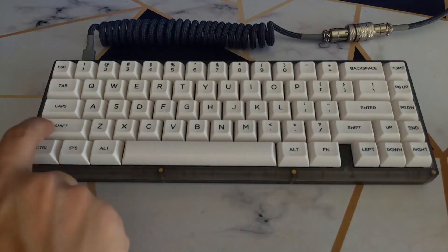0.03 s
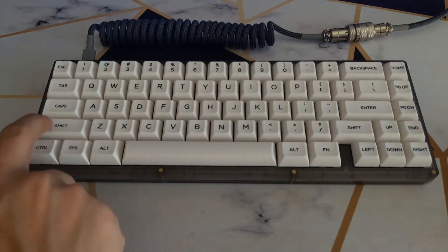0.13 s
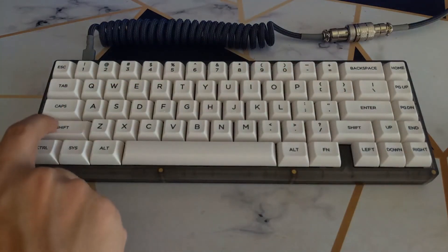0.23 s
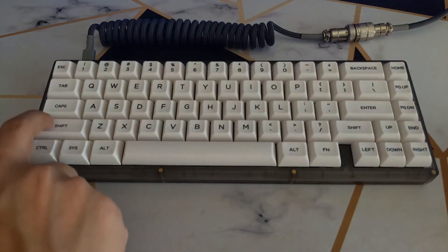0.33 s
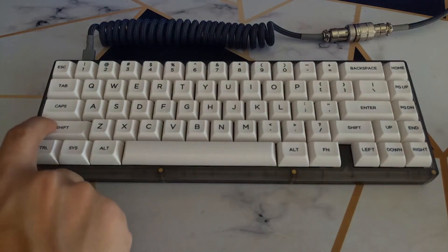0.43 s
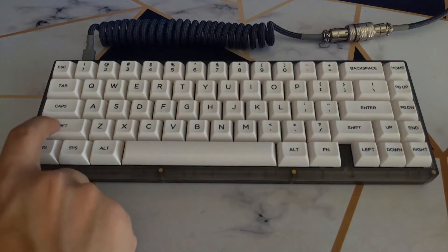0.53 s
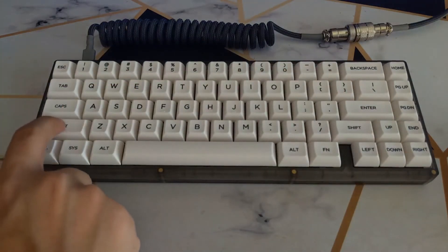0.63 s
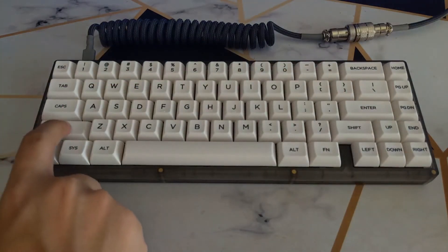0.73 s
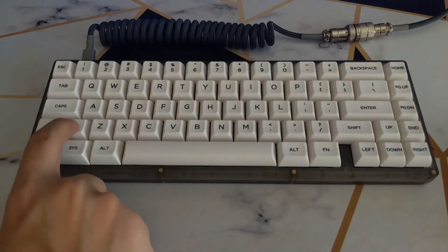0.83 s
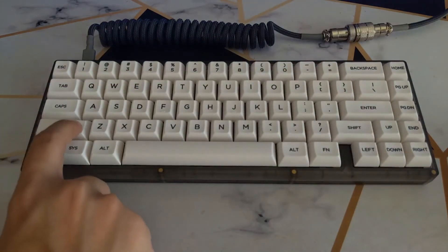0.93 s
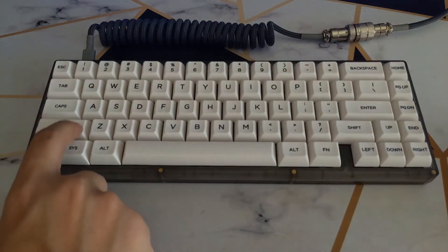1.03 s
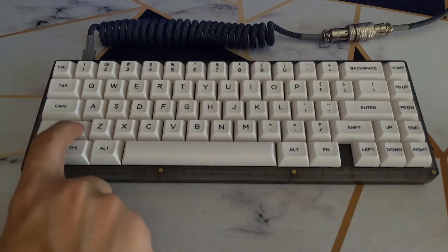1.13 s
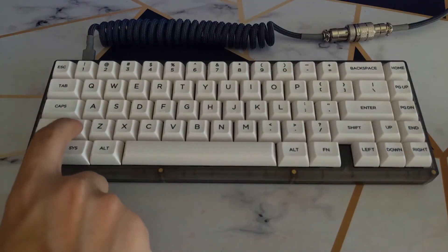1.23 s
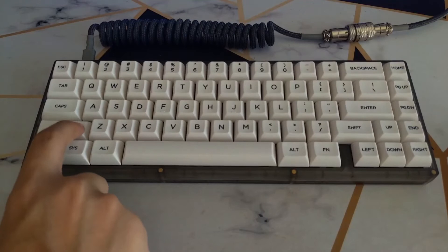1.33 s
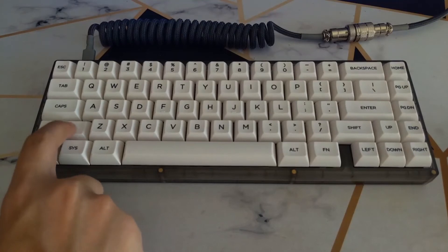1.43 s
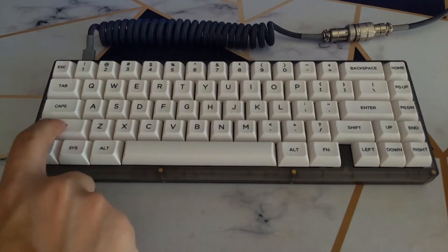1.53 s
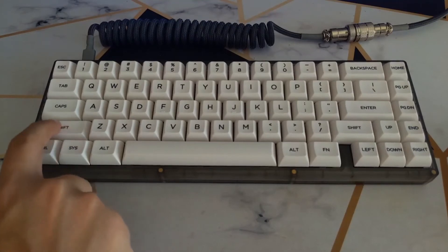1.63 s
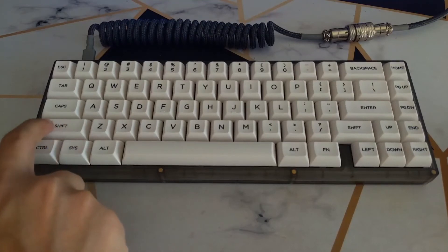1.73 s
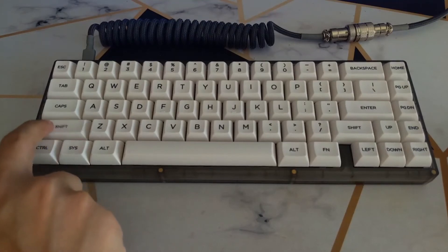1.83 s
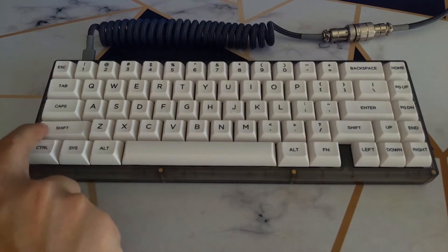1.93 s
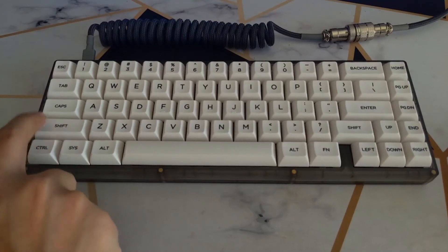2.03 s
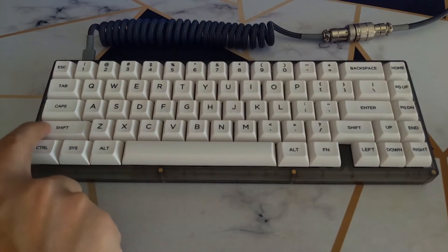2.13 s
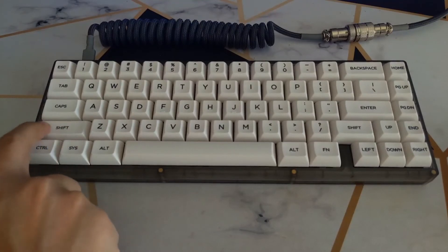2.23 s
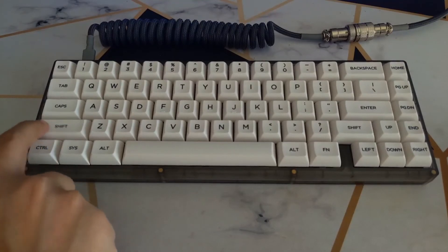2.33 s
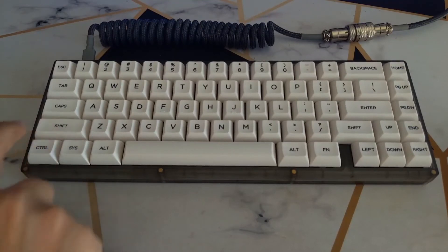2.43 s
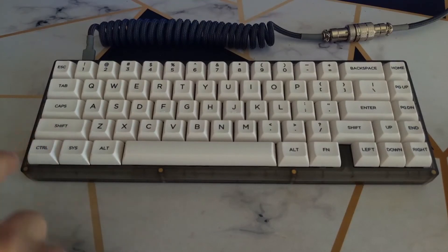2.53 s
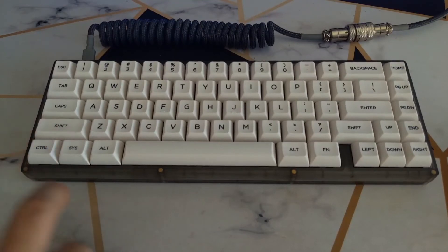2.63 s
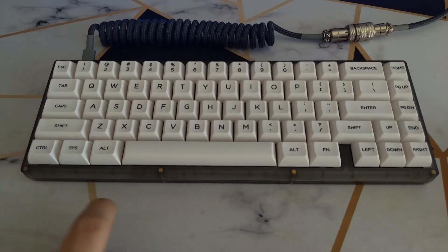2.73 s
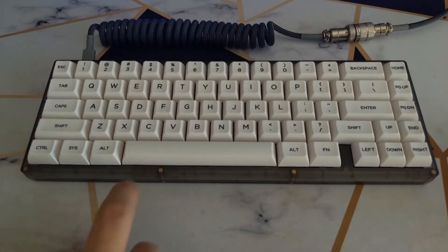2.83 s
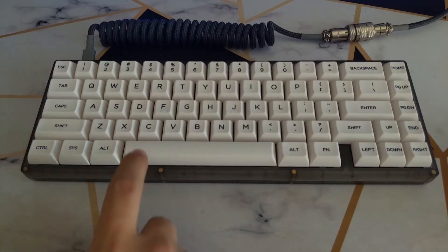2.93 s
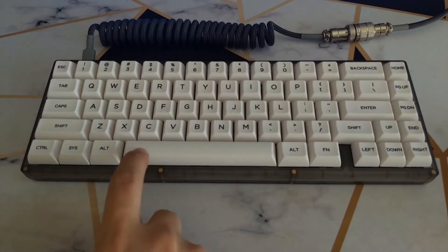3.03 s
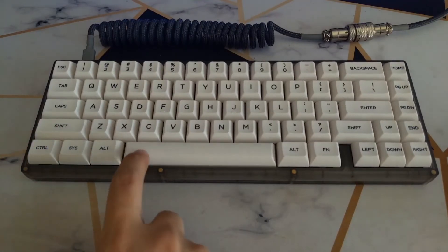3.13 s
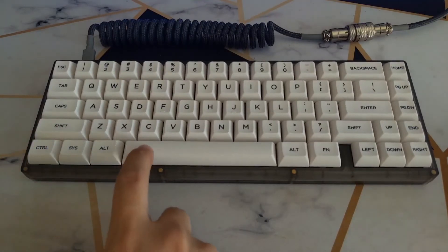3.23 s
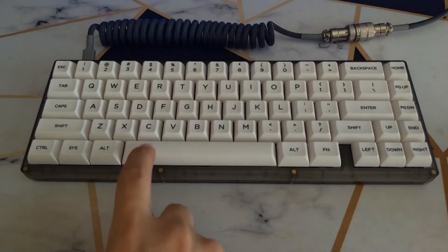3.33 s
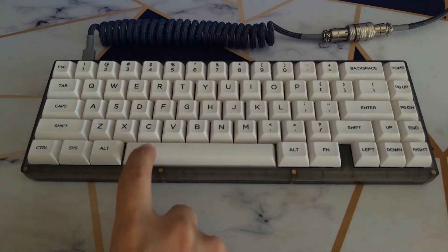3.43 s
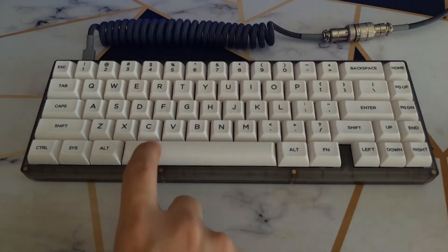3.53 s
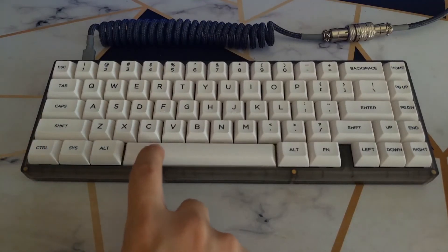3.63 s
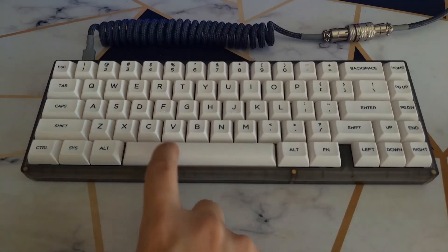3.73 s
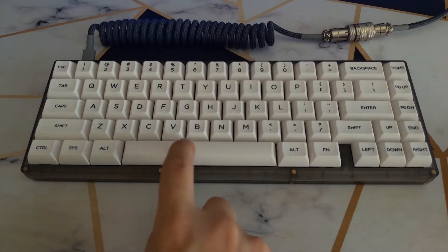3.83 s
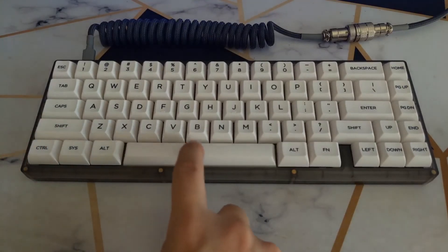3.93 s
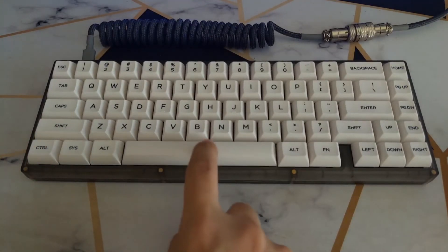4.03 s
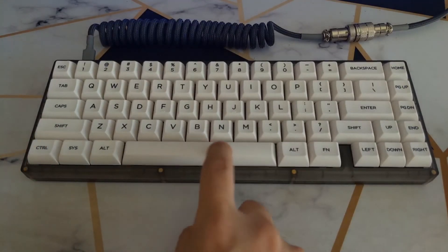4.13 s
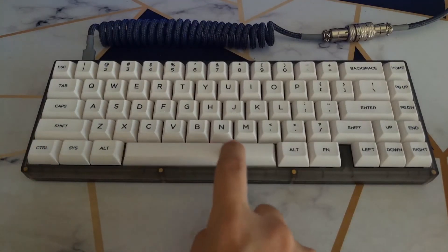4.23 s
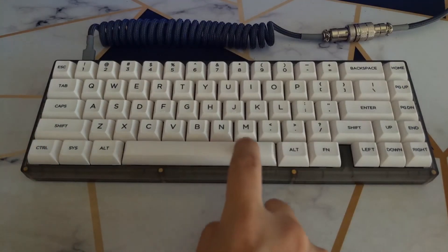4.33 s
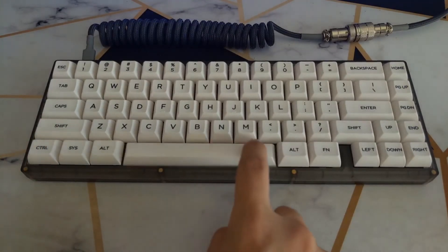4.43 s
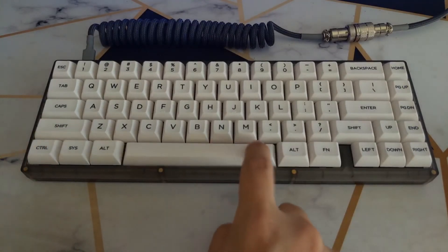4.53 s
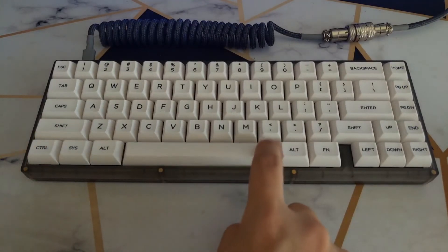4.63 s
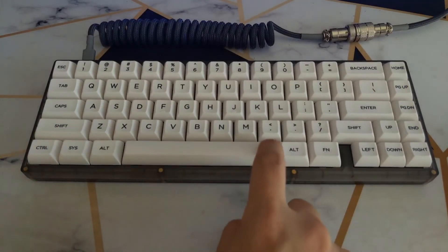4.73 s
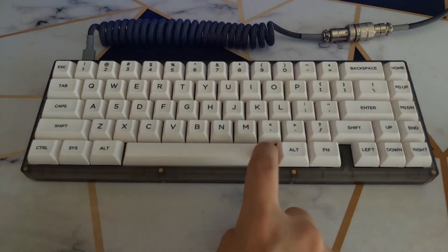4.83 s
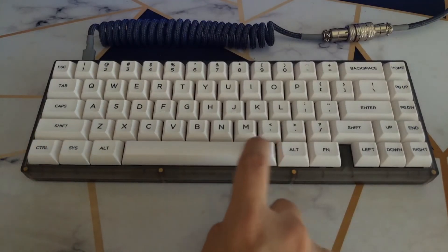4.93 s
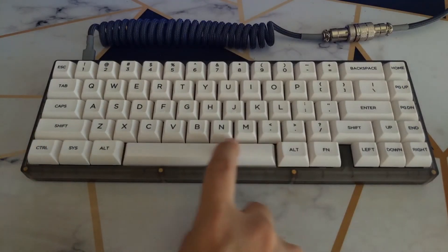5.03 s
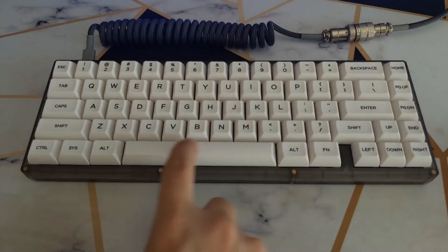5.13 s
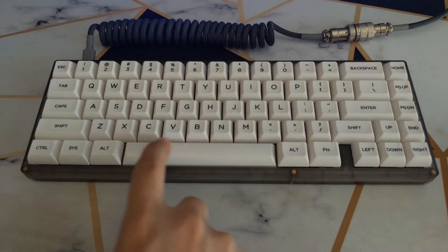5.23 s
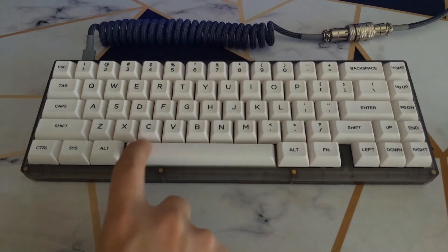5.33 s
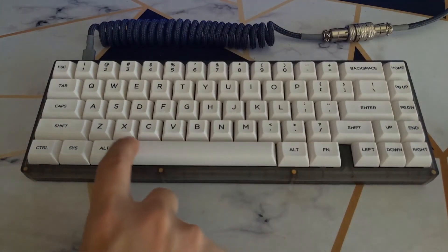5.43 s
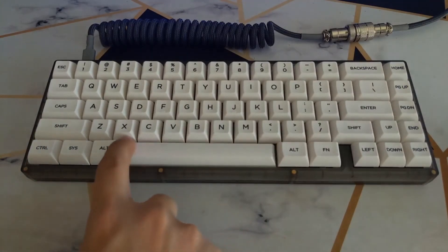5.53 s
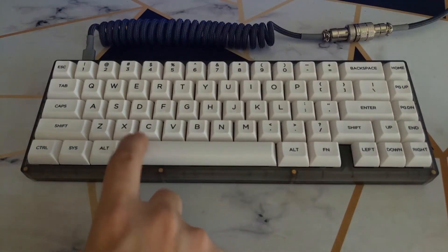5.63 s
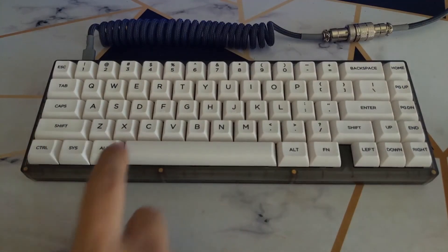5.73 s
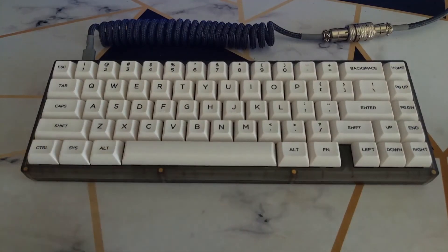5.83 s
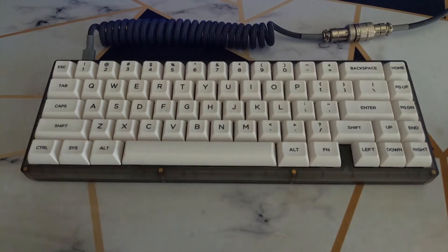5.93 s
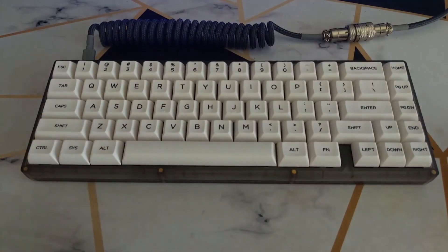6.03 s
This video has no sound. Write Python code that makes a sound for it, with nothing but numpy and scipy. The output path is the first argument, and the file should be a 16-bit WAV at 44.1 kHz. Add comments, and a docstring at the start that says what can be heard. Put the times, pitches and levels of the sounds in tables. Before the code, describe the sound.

A mechanical keyboard is heard close by in a small, quiet room with a short reverberation. From about 0.2 seconds one finger taps the shift key twelve times, evenly, at roughly six presses a second. Each press is a short, tight plastic thock, followed by a rattling clack as the key springs back, with a very faint spring ring. Some strokes are brighter, others softer, and faint fingertip ticks lead into several. The last release comes at 2.3 seconds, followed by a pause. At about 3.1 seconds a soft touch starts the space bar, which is pressed fifteen times at a similar pace. It sounds deeper and hollower, with little rattle, hesitates briefly around 4.4 seconds, then hits slightly harder until the final release near 5.6 seconds. Throughout, the strokes stir soft desk thumps and a low rumble, which fade by about 6 seconds.

```python
"""Mechanical keyboard: one finger taps the left shift key, then the space bar, close by in a small room.
Each key bottoms out with a short thock and springs back against its stop with a rattling clack;
both are contacts that ring the key's damped modes. Faint fingertip ticks and stem rub lead in.
The strokes also thump the desk, which booms and sways under the keyboard, and stir a low rumble."""
import sys
import numpy as np
from scipy import signal
from scipy.fft import rfft, irfft
from scipy.io import wavfile
from scipy.ndimage import uniform_filter1d

SR = 44100
rng = np.random.default_rng(int(sys.argv[2]) if len(sys.argv) > 2 else 0)


def output_pcm(signal):
    """Save a mono or channel-first signal as 16-bit PCM at the path in sys.argv[1].

    Samples are clipped to [-1, 1] before scaling.
    """
    pcm = np.clip(np.atleast_2d(signal).T, -1, 1) * 32767
    wavfile.write(sys.argv[1], SR, np.round(pcm).astype(np.int16))


N = 267687
CLICK_SAMPLES, LEAD_S = 4096, 0.003
BINS_HZ = np.fft.rfftfreq(CLICK_SAMPLES, 1 / SR)
USUAL_DB = -46.5  # reference stroke level

# Strokes: t/s, relative level/dB, snap/dB (how hard and bright the contact is); the first bar row is the finger
# landing softly on the bar
SHIFT_PRESSES = [(0.2055, -42.5, 3.5), (0.3819, -41, 12), (0.5465, -44.5, -6.5), (0.7059, -46, -3),
                 (0.9352, -42.5, -12), (1.0945, -41, 8.5), (1.2619, -39, 5), (1.419, -40, 10.5),
                 (1.5905, -44.5, 2), (1.7452, -39.5, 8), (1.9121, -40, -10), (2.0827, -38.5, -3)]
SHIFT_RELEASES = [(0.2843, -44.5, -0.5), (0.457, -45, -5.5), (0.6109, -41, 3), (0.7754, -48.5, 4.5),
                  (1.0238, -48.5, -18.5), (1.1952, -50.5, -33), (1.3451, -44.5, 25.5), (1.5045, -44, -8.5),
                  (1.6729, -44, -4), (1.8291, -42.5, -8.5), (1.9917, -38, 10), (2.3262, -44, -1)]
BAR_PRESSES = [(3.1349, -55.5, -43.5), (3.273, -45, -9), (3.4223, -38.5, 8.5), (3.571, -39, 8.5),
               (3.7298, -40.5, 2.5), (3.891, -40.5, -5.5), (4.0605, -40.5, -7.5), (4.2256, -41, -2),
               (4.4028, -46.5, -29), (4.6277, -37.5, 8.5), (4.7924, -38.5, 3.5), (4.968, -37.5, 8.5),
               (5.1468, -41, 3.5), (5.319, -36, 9), (5.4809, -36.5, 6)]
BAR_RELEASES = [(3.3257, -43.5, 7), (3.5002, -46.5, 0.5), (3.653, -46.5, 12), (3.8165, -46, -1),
                (3.9981, -47.5, -16), (4.1289, -45, -8), (4.2948, -46, -11), (4.5464, -41.5, 4),
                (4.7165, -43, -13), (4.8885, -42.5, -10.5), (5.0573, -45.5, -8.5), (5.2433, -43, -1),
                (5.408, -44.5, 7.5), (5.5621, -40.5, 11)]
STROKES = [*SHIFT_PRESSES, *SHIFT_RELEASES, *BAR_PRESSES, *BAR_RELEASES]


def gain_of(db):
    """Decibels to amplitude."""
    return 10 ** (np.asarray(db) / 20)


def unit_rms(x):
    """Scales to rms 1."""
    return x / np.sqrt(np.mean(x ** 2) + 1e-30)


def curve(points, hz):
    """Interpolates (f/Hz, value) points on a log frequency axis."""
    points_hz, value = np.transpose(points)
    return np.interp(np.log(hz + 1), np.log(points_hz + 1), value)


def add(mix, at_s, sound):
    """Mixes a sound in, in place."""
    part = mix[max(round(at_s * SR), 0):][:len(sound)]
    part += sound[:len(part)]


def noise(colour):
    """Steady noise, rms 1, shaped by (f/Hz, level/dB) points."""
    gain = gain_of(curve(colour, np.fft.rfftfreq(N, 1 / SR)))
    return unit_rms(irfft(rfft(rng.standard_normal(N)) * gain, N))


def minimum_phase(gain):
    """Spectrum of the quickest-starting pulse with this magnitude shape."""
    log_gain = np.log(np.maximum(gain / gain.max(), 1e-5))
    mirrored = np.r_[log_gain, log_gain[-2:0:-1]]
    pulse = np.fft.ifft(np.exp(np.conj(signal.hilbert(mirrored)))).real
    return rfft(pulse)


def resonances(hz, width_hz, db, detune=0.012, uneven_db=0.5):
    """Magnitude of damped modes; the spot struck shifts and weights them a little."""
    shift, weight = rng.standard_normal((2, len(hz), 1))
    offset = 2 * (BINS_HZ - hz[:, None] * (1 + detune * shift)) / width_hz[:, None]
    peaks = gain_of(db[:, None] + uneven_db * weight) / (1 + offset ** 2)
    return np.sqrt((peaks ** 2).sum(0))


def chatter(amount, fade_s, count=10):
    """Spectrum of one firm contact, then fading rebounds of stem and stabiliser wire."""
    delay_s = np.cumsum(rng.uniform(0.0004, 0.0015, count))
    rebounds = amount * rng.standard_normal(count) * np.exp(-delay_s / fade_s)
    return 1 + rebounds @ np.exp(-2j * np.pi * np.outer(delay_s, BINS_HZ))


def dispersion(centre_hz=2500):
    """Phase of a bending wave crossing the plate: the blow takes a cycle to build up."""
    ratio = BINS_HZ / centre_hz
    return np.exp(-2j * np.arctan2(ratio, 1 - ratio ** 2))


def click(spectrum, level_db):
    """Pulse that starts LEAD_S in, with the energy of 10 ms at level_db."""
    pulse = irfft(spectrum * np.exp(-2j * np.pi * BINS_HZ * LEAD_S))
    pulse *= signal.windows.tukey(CLICK_SAMPLES, 0.05)
    return gain_of(level_db) * pulse * np.sqrt(SR / 100) / np.linalg.norm(pulse)


def finger_touches():
    """The fingertip takes up the keycap's play: dull ticks with a slight rebound."""
    # Contacts: t/s, relative level/dB
    touches = [(0.173, -57), (0.3537, -52), (0.507, -56), (0.595, -58), (1.488, -61), (1.542, -58),
               (1.719, -49.5), (1.8901, -51.5), (2.0713, -51), (5.301, -59.5), (5.46, -60.5)]
    # Loose keycap: f/Hz, width/Hz, level/dB
    cap_modes = [(1953, 180, 12.5), (2457, 1100, 5.5), (3220, 230, -2)]
    softness = gain_of(curve([(700, -20.5), (1700, -4.5), (3200, -3.5), (4500, -24), (9000, -41.5)],
                             BINS_HZ))
    out = np.zeros(N)
    for at_s, level_db in touches:
        cap = minimum_phase(resonances(*np.transpose(cap_modes)) * softness)
        tick = cap * chatter(0.44, fade_s=0.0032) * dispersion()
        add(out, at_s - LEAD_S, click(tick, level_db))
    return gain_of(1) * out


def stem_rub(length_s=0.023, relative_db=-26):
    """The stem rubs in its housing, faster and faster, just before each stop."""
    level, t = np.zeros(N), np.arange(0, length_s, 1 / SR)
    for at_s, level_db, _ in STROKES:
        add(level, at_s - length_s, gain_of(level_db + relative_db) * (t / length_s) ** 2)
    friction = noise([(500, -33), (1200, -3.5), (2000, -5), (3200, -6.5), (4500, -20), (14000, -33)])
    return uniform_filter1d(level, size=90) * friction


def cap_ripple(uneven_db=4, width_bins=45):
    """Gain per frequency: each spot struck favours different small high modes of the cap."""
    ripple = uniform_filter1d(rng.standard_normal(len(BINS_HZ)), width_bins)
    ripple = unit_rms(uniform_filter1d(ripple, width_bins))
    return gain_of(uneven_db * ripple * curve([(3000, 0), (5000, 1)], BINS_HZ))


def mode_swarm(fade_s=0.0012):
    """Spectrum of a crowd of small plastic modes that swell and die within milliseconds."""
    age = np.arange(CLICK_SAMPLES) / SR / fade_s
    burst = rng.standard_normal(CLICK_SAMPLES) * np.sqrt(age) * np.exp(-age)
    return rfft(burst / np.linalg.norm(burst))


def case_knock(level_db, hz, t60_s=0.038, rise_s=0.002):
    """The case gives under the blow: a few cycles of hollow thock."""
    t = np.arange(CLICK_SAMPLES) / SR
    envelope = gain_of(level_db - 60 * t / t60_s) * (1 - np.exp(-t / rise_s))
    return -envelope * np.sin(2 * np.pi * hz * t)


def key_strokes(rows, hz, width_hz, mode_db, rattle, rattle_s, knock_db, knock_hz, top_hz, body_db,
                rounding=0):
    """Strokes ring the key's modes and knock the case. Returns direct sound and room feed."""
    # Weak radiation of the case between its knock and the keys' ring: f/Hz, gain/dB
    radiation = [(400, -3), (560, -6.5), (740, -5), (900, 0.5)]
    body = curve([(1300, 1), (2000, 0.11)], BINS_HZ)
    snap = curve([(3500, 0.36), (5000, 0.39), (6200, 0.58), (10000, 0.96), (14000, 1.7)], BINS_HZ)
    swarm_rad = np.pi / 2 * 0.65 / (1 + (4600 / (BINS_HZ + 1)) ** 8)  # treble: clean tick to swarm
    direct, room_feed = np.zeros((2, N))
    for at_s, level_db, snap_db in rows:
        stroke_body_db = body_db + rounding * (USUAL_DB - level_db)  # gentler sounds rounder
        colour = gain_of(stroke_body_db * body + snap_db * snap + curve(radiation, BINS_HZ))
        contact_hz = top_hz * 2 ** (snap_db / 24)  # a soft contact lasts longer and loses the top
        colour *= cap_ripple() / np.sqrt(1 + (BINS_HZ / contact_hz) ** 20)
        contacts = chatter(rattle, rattle_s) * dispersion()
        near = minimum_phase(resonances(hz, width_hz, mode_db) * colour) * contacts
        near *= np.cos(swarm_rad) + np.sin(swarm_rad) * mode_swarm()
        add(direct, at_s - LEAD_S, click(near, level_db))
        add(direct, at_s, case_knock(level_db + knock_db, knock_hz))
        # The room collects all directions, so the modes merge.
        far = minimum_phase(resonances(hz, 1.38 * width_hz, mode_db) * colour) * contacts
        add(room_feed, at_s - LEAD_S, click(far, level_db))
    return np.array([direct, room_feed])


def shift_key():
    """Short key: a tight press, a chattering release and a faint lingering ring, likely its spring."""
    # Key modes: f/Hz, width/Hz, press level/dB, release level/dB
    key_modes = [(440, 170, -29.5, -12.5), (869, 225, -3.5, -4), (1370, 770, -7.5, -30),
                 (1486, 260, -5, -6), (1870, 210, 0, -5), (2145, 550, 1, -7.5), (2450, 440, -5.5, -1),
                 (2800, 290, -5, -9.5), (3151, 270, 1, -3.5), (3880, 650, -15, -18.5),
                 (4760, 640, -17, -25), (7470, 2900, -27, -36), (9600, 410, -34.5, -28),
                 (10740, 540, -38, -56), (13900, 360, -29, -46.5)]
    # Spring resonances: f/Hz, impulse response level/dB, t60/s
    spring_modes = [(3310, -65, 0.29), (4750, -62, 0.22)]
    hz, width_hz, press_db, release_db = np.transpose(key_modes)
    presses = key_strokes(SHIFT_PRESSES, hz, width_hz, press_db, rattle=0.33, rattle_s=0.0027,
                          knock_db=-24, knock_hz=373, top_hz=13150, body_db=-1.5)
    releases = key_strokes(SHIFT_RELEASES, hz, width_hz, release_db, rattle=0.9, rattle_s=0.0038,
                           knock_db=-13.5, knock_hz=365, top_hz=11500, body_db=-2.5, rounding=1)
    key = gain_of(0.33) * presses + gain_of(1.12) * releases
    t = np.arange(SR // 3) / SR
    spring = sum(gain_of(db - 60 * t / t60_s) * np.sin(2 * np.pi * ring_hz * t)
                 for ring_hz, db, t60_s in spring_modes)
    return key + signal.fftconvolve(key, spring[None], axes=1)[:, :N]


def desk_thumps(rows, force_db, key):
    """Each stroke pushes through the case into the desk's low modes; key is "shift" or "bar"."""
    # Desk top: f/Hz, level under shift/dB, level under bar/dB, t60/s
    desk_modes = [(49.07, -49, -49.5, 1.0), (94.36, -62, -67, 0.93), (131.5, -63.5, -59.5, 0.3),
                  (225.5, -65, -60, 0.16), (260, -73, -80.5, 0.26), (277.2, -89, -66, 0.33),
                  (305.6, -74, -74.5, 0.48), (351, -80, -66, 0.15), (376, -70, -93, 0.14),
                  (442, -81, -72, 0.16)]
    out, t = np.zeros(N), np.arange(SR) / SR
    mean_db = np.mean([level_db for _, level_db, _ in rows])
    attack = 1 - np.exp(-t / 0.0036)
    for at_s, level_db, _ in rows:
        ring = np.zeros(SR)
        for hz, shift_db, bar_db, t60_s in desk_modes:
            mode_db = shift_db if key == "shift" else bar_db
            envelope = rng.uniform(0.7, 1.3) * gain_of(mode_db - 60 * t / t60_s)
            ring += envelope * np.sin(2 * np.pi * hz * t + rng.uniform(-1, 1))
        add(out, at_s, -gain_of(force_db + 0.54 * (level_db - mean_db)) * ring * attack)
    return out


def vibration_level(t60_s, rise_s, force_share, lever_db=0):
    """Envelope fed by every stroke, dying between them; the right edge pushes lever_db harder."""
    # Finger path: t/s, place/keyboard widths from the left edge
    finger_path = [(2.4, 0.12), (3.0, .28), (3.75, 0.18), (4.25, 0.94), (4.7, 0.5), (5.25, 0.23),
                   (5.6, 0.14)]
    power, t = np.zeros(N), np.arange(2 * SR) / SR
    swell = (1 - np.exp(-t / rise_s)) * gain_of(-60 * t / t60_s)
    for at_s, level_db, _ in STROKES:
        place = np.interp(at_s, *np.transpose(finger_path))
        push_db = force_share * (level_db - USUAL_DB) + lever_db * place
        add(power, at_s, (gain_of(push_db) * swell) ** 2)
    return np.sqrt(power)


def desk():
    """Thumps over the slow sway and deep boom that the strokes build up in the whole desk."""
    # Sway spectrum: f/Hz, relative level/dB
    sway_colour = [(10, -35.5), (21, -11.5), (24.5, 5.5), (29, -2.5), (36, -13), (60, -58), (200, -110)]
    # Boom spectrum: f/Hz, relative level/dB
    boom_colour = [(20, -30.5), (36, -1.5), (51, -0.5), (62, -12.5), (76, -30.5), (93, -14.5), (108, -31.5),
                   (200, -73), (400, -110)]
    thumps = desk_thumps(SHIFT_PRESSES, force_db=0, key="shift")
    thumps += desk_thumps(SHIFT_RELEASES, force_db=-7, key="shift")
    thumps += desk_thumps(BAR_PRESSES, force_db=2, key="bar")
    thumps += desk_thumps(BAR_RELEASES, force_db=2.5, key="bar")
    sway = vibration_level(t60_s=3.4, rise_s=0.005, force_share=0.27, lever_db=22) * noise(sway_colour)
    boom = vibration_level(t60_s=2.1, rise_s=0.0047, force_share=0.15) * noise(boom_colour)
    return thumps + gain_of(-54.5) * sway + gain_of(-53) * boom


def room_tail():
    """Reflections as sparse taps of random sign, each band dying at its own rate."""
    # Room response: f/Hz, gain/dB
    room_colour = [(150, 0.7), (400, 26), (750, 9.6), (1200, 6.7), (2500, 2.4), (4500, 7.3), (8000, 13),
                   (14000, 4)]
    # Room decay: f/Hz, t60/s
    room_decay = [(200, 0.31), (700, 0.25), (1500, 0.26), (3000, 0.24), (6000, 0.28), (14000, 0.097)]
    taps = np.zeros(SR // 2)
    slots = np.arange(220, len(taps) - 12, 12)
    taps[slots + rng.integers(0, 12, len(slots))] = rng.choice([-1.0, 1.0], len(slots))
    hz, t, bands = signal.stft(taps, SR, nperseg=256)
    gain_db = curve(room_colour, hz)[:, None] - 60 * t / curve(room_decay, hz)[:, None]
    return signal.istft(bands * gain_of(gain_db), SR, nperseg=256)[1] / np.sqrt(len(slots))


def room(direct, room_feed, wet_db=-3, tails=3):
    """Early echoes, then short tails, crossfaded so that the decay varies from stroke to stroke."""
    # Near surfaces: delay/s, gain
    echoes = [(.0036, 0.027), (.0064, 0.03), (.0081, 0.028), (.0100, 0.031), (0.0093, .04), (.0185, 0.026)]
    out, t = direct.copy(), np.arange(N) / SR
    for delay_s, gain in echoes:
        add(out, delay_s, gain * room_feed)
    for k in range(tails):
        share = np.cos(np.pi * (2.1 * t + k / tails)) * np.sqrt(2 / tails)
        out += gain_of(wet_db) * signal.fftconvolve(room_feed * share, room_tail())[:N]
    return out


def background(rest_db=-90.5, stirred_db=-75, hiss_db=-100.5):
    """Low, wavering rumble stirred by the strokes and the moving hand, and a very faint hiss."""
    # Hand rustling over the desk: start/s, length/s, level/dB
    hand_moves = [(2.93, .2, -74.5), (5.764, 0.6, -71)]
    # Rumble spectrum: f/Hz, relative level/dB
    rumble_colour = [(40, -8.5), (90, -1.5), (160, 0), (195, -8.5), (220, 8.5), (250, -6), (320, -6),
                     (450, -23), (700, -34), (1200, -50.5), (3000, -63)]
    stirred = vibration_level(t60_s=1.9, rise_s=0.02, force_share=0.7)
    level = gain_of(rest_db) + gain_of(stirred_db) * stirred
    for at_s, length_s, level_db in hand_moves:
        add(level, at_s, gain_of(level_db) * np.hanning(round(length_s * SR)))
    waver_db = 2.5 * noise([(1, 0), (7, 0), (16, -40), (60, -140)])
    rumble = level * gain_of(waver_db) * noise(rumble_colour)
    return rumble + gain_of(hiss_db) * rng.standard_normal(N)


def space_bar():
    """Long key: deeper, with a hollow knock and little rattle."""
    # Bar modes: f/Hz, width/Hz, press level/dB, release level/dB
    bar_modes = [(333.3, 36, -18, -28.5), (828, 23, -33, -9.5), (910, 280, -14, -17.5),
                 (1159, 290, -3.5, -5.5), (1374, 320, -1.5, -4), (1769, 252, -1.5, 1), (1968, 170, -14, -6),
                 (2535, 383, -6, -4.5), (3447, 720, -13.5, -20), (3644, 200, -14, -39),
                 (4368, 140, -19, -26.5), (5786, 820, -28.5, -38), (8350, 1040, -31.5, -39),
                 (10240, 870, -38.5, -34), (13100, 650, -44, -74)]
    hz, width_hz, press_db, release_db = np.transpose(bar_modes)
    presses = key_strokes(BAR_PRESSES, hz, width_hz, press_db, rattle=0.18, rattle_s=0.0048,
                          knock_db=-2, knock_hz=260, top_hz=11830, body_db=-2)
    releases = key_strokes(BAR_RELEASES, hz, width_hz, release_db, rattle=0.17, rattle_s=0.016,
                           knock_db=-7, knock_hz=230, top_hz=11800, body_db=1.2, rounding=1)
    return gain_of(-0.5) * presses + gain_of(-0.18) * releases


def scene():
    """Keys in the room, on the desk; mono."""
    direct, room_feed = shift_key() + space_bar() + finger_touches() + stem_rub()
    return (room(direct, room_feed) + desk() + background())[None]


def record(dry):
    """Brief fades at both ends and a 15.6 kHz band limit."""
    faded = dry * signal.windows.tukey(N, 0.004)
    lowpass = signal.firwin(511, 15600, window=("kaiser", 9), fs=SR)
    return signal.oaconvolve(faded, lowpass[None], "same")


dry = scene()
out = record(dry)
output_pcm(out)
```